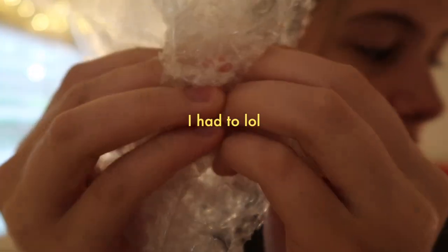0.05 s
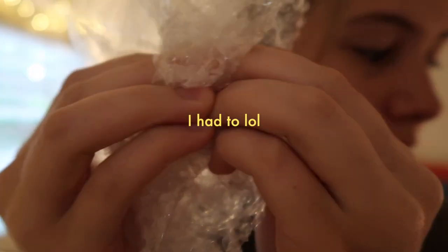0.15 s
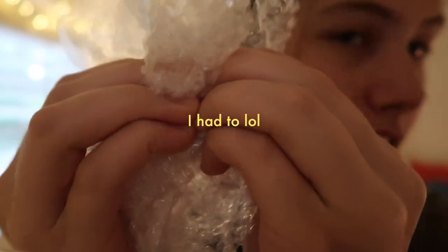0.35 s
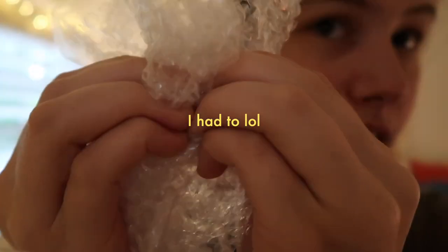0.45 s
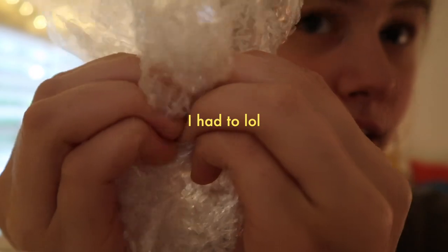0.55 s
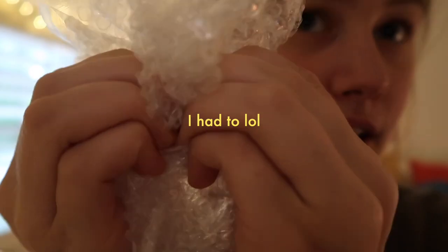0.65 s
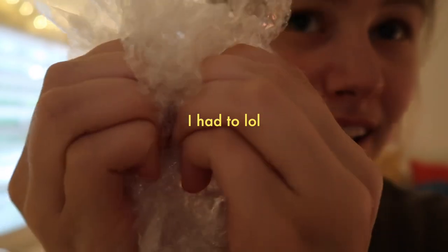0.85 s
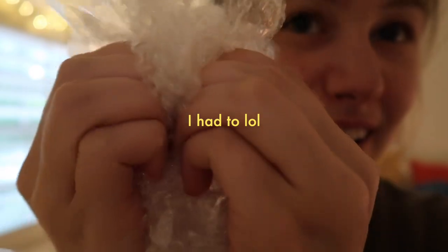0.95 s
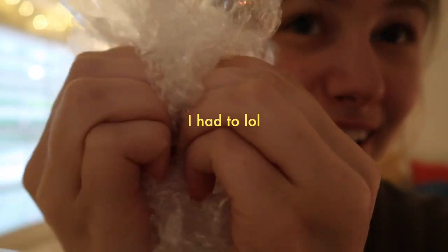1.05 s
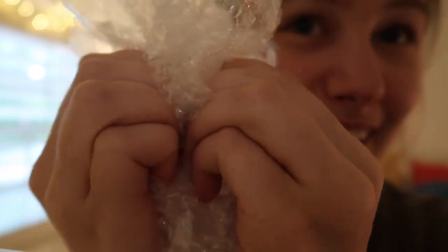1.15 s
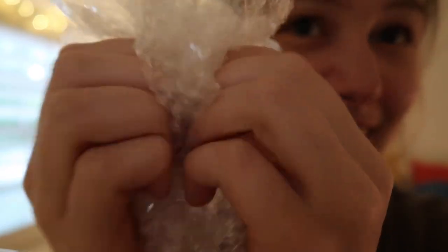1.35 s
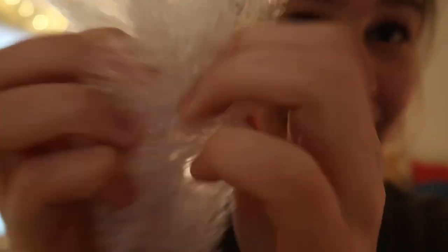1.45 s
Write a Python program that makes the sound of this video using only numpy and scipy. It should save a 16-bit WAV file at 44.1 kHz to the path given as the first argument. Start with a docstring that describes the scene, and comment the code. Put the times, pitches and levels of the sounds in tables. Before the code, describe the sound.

Bubble wrap pops in rapid, uneven clusters, some loud and some slight, as hands twist it right by the microphone. Faint plastic crinkling runs underneath and swells at the end with light snaps. The room is small and quiet.

```python
"""A wad of bubble wrap is wrung in two hands close to a stereo microphone in a small quiet room.
At first the film crinkles and fingers rub over faint air noise and hum. From 0.1 to 1.1 s bubbles burst
in clusters: each is a pressure swing of a few cycles, a crack of tearing film and a short ring of the
cupped wad, answered by the ceiling and then the room. The loudest pops saturate the microphone.
At the end the crinkling swells as the grip tightens, and three creases snap."""
import sys
import numpy as np
from scipy import signal
from scipy.fft import rfft, irfft, next_fast_len
from scipy.io import wavfile

SR = 44100
rng = np.random.default_rng(int(sys.argv[2]) if len(sys.argv) > 2 else 0)


def wrap_up_sound(samples):
    """Save the sound to the file named by the first command line argument, as 16-bit audio."""
    columns = np.atleast_2d(samples).T
    # keep every value between -1 and 1, then stretch to whole-number steps
    tamed = np.clip(columns, -1, 1)
    steps = np.round(tamed * 32767).astype(np.int16)
    wavfile.write(sys.argv[1], SR, steps)


N = 66150


def amp(db):
    """Decibels to amplitude ratio."""
    return 10 ** (np.asarray(db) / 20)


def unit_rms(x):
    """Normalisation to an rms of 1."""
    return x / np.sqrt(np.mean(x ** 2) + 1e-20)


def at_frequency(points, hz):
    """Interpolation of (frequency, value) points on a logarithmic frequency axis."""
    point_hz, values = np.transpose(points)
    return np.interp(np.log(hz + 1), np.log(point_hz + 1), values)


def envelope(points):
    """Amplitude envelope through (time, level) points, linear in decibels."""
    return amp(np.interp(np.arange(N) / SR, *np.transpose(points)))


def coloured(x, spectrum):
    """Minimum-phase filtering: folding the cepstrum makes the given gain curve causal."""
    n = x.shape[-1]
    size = 2 * next_fast_len(n // 2 + 2048)
    gain = amp(at_frequency(spectrum, np.fft.rfftfreq(size, 1 / SR)))
    cepstrum = irfft(np.log(gain), size)
    cepstrum[1:size // 2] *= 2
    cepstrum[size // 2 + 1:] = 0
    return irfft(rfft(x, size) * np.exp(rfft(cepstrum)), size)[..., :n]


def decay(t, t60):
    """Exponential damping by 60 dB in t60."""
    return np.exp(-np.log(1000) * t / t60)


def left_right(mid, side):
    """Sum-and-difference stereo."""
    return np.array([mid + side, mid - side])


def add(track, start_s, sound):
    """Superposition of a sound on the track."""
    part = track[..., round(start_s * SR):][..., :sound.shape[-1]]
    part += sound[..., :part.shape[-1]]


# Likeness of the room's sound at the two microphone ports: frequency_hz, correlation
PORT_COHERENCE = [(60, 0.99), (400, 0.75), (3100, 1), (7500, -0.82)]

def diffuse(pair):
    """Spatial coherence: two independent signals are mixed as the ports hear a diffuse field."""
    n = pair.shape[-1]
    correlation = at_frequency(PORT_COHERENCE, np.fft.rfftfreq(n, 1 / SR))
    angle = np.arccos(np.clip(correlation, -.99, .99)) / 2
    mid, side = irfft(rfft(pair) * [np.cos(angle), np.sin(angle)], n)
    return left_right(mid, side)


# Spectrum of the air noise: frequency_hz, gain_db
AIR_SPECTRUM = [(25, -11), (60, 0), (170, -3), (300, -12.5), (1500, -15.5), (5000, -24), (15000, -66)]
# Steady tones in the room: pitch_hz, level_db
HUM_TONES = [(120, -66), (560, -73.5)]

def room_tone(air_db=-57):
    """Ambient noise floor: diffuse broadband noise and a faint hum of pure tones."""
    air = unit_rms(diffuse(coloured(rng.standard_normal((2, N)), AIR_SPECTRUM)))
    hum = sum(amp(db) * unit_rms(np.sin(2 * np.pi * hz * np.arange(N) / SR)) for hz, db in HUM_TONES)
    return amp(air_db) * air + hum


# Fingers shifting on the wad: time_s, level_db
RUB_LEVELS = [(.1, -50.5), (.3, -55), (.72, -54), (.88, -61), (1.48, -55.5)]
# Spectrum of the rubbing: frequency_hz, gain_db
RUB_SPECTRUM = [(120, -15), (250, 3.5), (1000, -29.5)]

def finger_rub():
    """Sliding friction: skin on film makes a dull noise."""
    rub = unit_rms(diffuse(coloured(rng.standard_normal((2, N)), RUB_SPECTRUM)))
    return rub * envelope(RUB_LEVELS)


# Crinkling of the strained film: time_s, level_db
CRINKLE_LEVELS = [(0, -52.5), (.45, -54.5), (.6, -49), (.75, -50.5), (1.09, -51), (1.25, -67), (1.35, -56),
                  (1.44, -47), (1.49, -40.5)]
# Spectrum of the crinkling, also of a pop's scattered sound: frequency_hz, gain_db
CRINKLE_SPECTRUM = [(100, -41), (500, -2.5), (1000, -9), (1800, -2), (3100, -2.5), (5600, -14.5),
                    (8000, -16.5), (10500, -39.5), (14000, -31.5)]
# Port difference over port sum, for crinkles and cracks: frequency_hz, gain_db
SIDE_SPECTRUM = [(2200, -24), (5000, -2), (12000, 9.5)]
# Creases snapping: start_s, peak_db
CREASES = [(1.3427, -35), (1.4713, -24.5), (1.4889, -21.5)]

def crinkle(snaps_per_s=7000, spread_db=3, side_db=-12, crease_hz=2360, crease_decay_s=0.00016):
    """Shot noise: tiny random snaps of the strained film merge, while a few creases stand out."""
    snaps = (rng.random((2, N)) < snaps_per_s / SR) * rng.standard_normal((2, N))
    snaps *= amp(spread_db * np.clip(rng.standard_normal(N), -2, 2))
    mid, side = coloured(snaps, CRINKLE_SPECTRUM)
    side = amp(side_db) * coloured(side, SIDE_SPECTRUM)  # narrower than the cracks
    film = unit_rms(left_right(mid, side)) * envelope(CRINKLE_LEVELS)
    t = np.arange(SR // 100) / SR
    crease = t ** 2 * np.exp(-t / crease_decay_s) * np.sin(2 * np.pi * crease_hz * t)
    for start_s, peak_db in CREASES:
        add(film, start_s, amp(peak_db) * crease / np.abs(crease).max())
    return film


# Reverberation time of the room: frequency_hz, t60_s
REVERB_TIMES = [(200, 0.2), (1000, 0.37), (2500, 0.22)]

def room_response(onset_s=.007, rise_s=0.0008, first_echoes_per_s=800, quadruple_s=.016):
    """Reverberation: echo density grows quadratically with time; each frequency decays at its own rate."""
    age = np.maximum(np.arange(SR // 2) / SR - onset_s, 0)
    chance = np.clip(first_echoes_per_s / SR * (1 + age / quadruple_s) ** 2, 1e-3, 1)
    shape = (2, len(age))
    echoes = (rng.random(shape) < chance) * np.sign(rng.standard_normal(shape)) / np.sqrt(chance)
    echoes *= 1 - np.exp(-age / rise_s)
    hz, t, bands = signal.stft(echoes, SR, nperseg=256)
    bands *= decay(t, at_frequency(REVERB_TIMES, hz)[:, None])
    tail = diffuse(signal.istft(bands, SR, nperseg=256)[1])
    return tail / np.linalg.norm(tail[0])


# Modes of the air in the wad and the cupped hands: pitch_hz, level_db, t60_s
WAD_MODES = [(445, -29.5, 0.03), (875, -20.5, 0.017), (1194, -15, 0.0098), (1870, -16, 0.0042)]

def wad_ring(t, pitch_spread=.035, spread_db=1.5):
    """Cavity resonance: damped modes whose pitch and level vary a little from pop to pop."""
    ring = 0
    for hz, db, t60 in WAD_MODES:
        gain = amp(db + rng.normal(0, spread_db))
        pitch_hz = hz * (1 + rng.normal(0, pitch_spread))
        ring += gain * decay(t, t60) * np.sin(2 * np.pi * pitch_hz * t)
    return ring


# Spectrum of tearing film: frequency_hz, gain_db
TEAR_SPECTRUM = [(300, -22), (2000, 9.5), (4300, 4.5), (5800, -4.5), (7500, -6), (10000, -15), (16000, -27)]

def film_crack(t, attack, gain_db=-12.5, t60_s=0.014):
    """Fracture: the tearing film radiates a bright, quickly damped burst of noise."""
    noise = unit_rms(coloured(rng.standard_normal(t.shape), TEAR_SPECTRUM))
    mid, side = noise * decay(t, t60_s) * attack
    return amp(gain_db) * left_right(mid, coloured(side, SIDE_SPECTRUM))


# Colour of a pop at the microphone: frequency_hz, gain_db
POP_SPECTRUM = [(40, -15.5), (300, -0.5), (1230, 1), (1420, -5), (1620, 4.5), (3300, -0.5), (4800, -5),
                (5700, -16.5), (7300, -3), (10000, -18)]
MAX_PORT_LAG_S, FLAP_RISE_S = 1.6e-5, 0.00021
SCATTER_DB, SCATTER_T60_S = -16.5, 0.012  # off the hands and the microphone's housing

def pop(pitch_hz, rise_ms, ring_db, crack_db, film_hz):
    """Sudden pressure release: the freed air swings, the wad rings, the film cracks and flaps."""
    lag_s = np.clip(rng.standard_normal(), -1, 1) * MAX_PORT_LAG_S / 2
    t = np.maximum(np.arange(SR // 25) / SR + np.array([[lag_s], [-lag_s]]), 0)
    rises = t * 1000 / rise_ms  # time in units of the rise to the pulse's peak
    pulse = rises * np.exp(1 - rises)
    attack = 1 - np.exp(-rises)
    swing = pulse * np.cos(2 * np.pi * pitch_hz * t)
    swing -= pulse * swing.sum() / pulse.sum()  # zero mean pressure
    flap = t / FLAP_RISE_S * np.exp(1 - t / FLAP_RISE_S) * np.sin(2 * np.pi * film_hz * t)
    ring = wad_ring(t) * attack
    noise = unit_rms(coloured(rng.standard_normal(t.shape[1]), CRINKLE_SPECTRUM))
    scatter = noise * decay(t, SCATTER_T60_S) * (1 - np.exp(-rises / 2))
    body = swing + amp(crack_db) * flap + amp(ring_db) * (amp(SCATTER_DB) * scatter - ring)
    return coloured(body, POP_SPECTRUM) + amp(crack_db) * film_crack(t, attack)


# Colour of the ceiling reflection: frequency_hz, gain_db
CEILING_SPECTRUM = [(1200, -7), (2000, 8.5), (3200, -2.5), (6000, 10)]
# What the pops radiate into the room: frequency_hz, gain_db
ROOM_SPECTRUM = [(100, -14.5), (450, -7.5), (1100, -6.5), (2100, 4), (4500, -2), (7000, -6.5), (10000, -33)]
# Bursting bubbles, with ring, crack and room relative to their pop:
# start_s, level_db, pitch_hz, rise_ms, ring_db, crack_db, film_hz, room_db
BURSTS = [(0.1054, -23.5, 1300, 0.18, 4, -22, 3220, -10), (0.2143, 1.8, 2570, 0.14, -7.5, -7.5, 5820, -1),
          (0.2766, -9, 3450, 0.044, 6, -7, 2740, 3.5), (0.316, -7, 2170, 0.17, 2.7, -10.5, 2850, 0),
          (0.4841, -10.0, 3200, 0.17, 10, -16, 5360, 0), (0.4991, -13, 1590, 0.17, 7, -4.5, 4840, -1),
          (0.518, 0.5, 1940, 0.11, 0.6, -13, 5650, 1.5), (0.5584, -12.5, 1260, 0.13, -6, -5.5, 3770, -4),
          (0.5718, -22, 1300, 0.31, 9, -16, 3580, 5.5), (0.6069, -2, 2760, 0.15, -2, -5, 4830, 1.5),
          (0.6239, -5.5, 3140, 0.029, 3.5, -7.5, 4100, 4.5), (0.7094, -24, 1320, 0.17, 1.6, 1.5, 3260, 0),
          (0.7831, -19, 1293, 0.31, 11.5, 7.5, 3680, 4.5), (0.8005, 2.9, 2450, 0.25, -16, -20, 6600, -9),
          (0.825, -22, 2370, 0.17, 11.5, 8, 4370, 4.5), (0.8292, -15.5, 1710, 0.091, 3.5, -1, 3790, -3),
          (0.8715, -16, 2450, 0.2, 1, -14, 4870, -8), (0.934, -17, 3330, 0.145, -3.9, -15.5, 4870, -9),
          (0.9517, -11.5, 1350, 0.097, 1, -2.7, 4600, -0.5), (0.9718, -1.8, 2720, 0.12, -3.5, -8, 4570, -3),
          (1.0133, -11.5, 1430, 0.083, 6, 5, 3880, 4), (1.0395, -21, 3440, 0.05, 11, -4, 3010, -7.5),
          (1.064, -3, 1640, 0.081, -12.5, -8, 4500, 3.5), (1.084, -10, 1380, 0.098, -31, -4, 4020, 8),
          (1.0941, -1, 2210, 0.15, -12.5, -14.5, 3300, -12.5),
          (1.123, -14.5, 2210, 0.296, 3, -9, 3540, -5.5)]
REVERB_DB_PER_DB = 0.88  # below 1: the loudest pops face the microphone

def bubbles(ceiling_delay_s=.0071, ceiling_db=-21, reverb_db=-6):
    """Multipath propagation: each pop arrives directly, off the ceiling and as reverberation."""
    direct, outgoing, tails, ceiling_echo = np.zeros((4, 2, N))
    for start_s, level_db, pitch_hz, rise_ms, ring_db, crack_db, film_hz, room_db in BURSTS:
        burst = amp(level_db) * pop(pitch_hz, rise_ms, ring_db, crack_db, film_hz)
        add(direct, start_s, burst)
        add(outgoing, start_s, amp(room_db) * burst)
        excitation = amp(room_db) * np.linalg.norm(burst[0]) ** REVERB_DB_PER_DB
        add(tails, start_s, excitation * room_response())
    add(ceiling_echo, ceiling_delay_s, coloured(outgoing, CEILING_SPECTRUM))
    return direct + amp(ceiling_db) * ceiling_echo + amp(reverb_db) * coloured(tails, ROOM_SPECTRUM)


def scene():
    """Linear superposition: room tone, rubbing, crinkling and pops add as pressures."""
    return room_tone() + finger_rub() + crinkle() + bubbles()


def record(dry):
    """Saturation and band limiting: peaks are rounded off at full scale, then the top treble is cut."""
    cutoff_hz = 16400
    saturated = dry / (1 + np.abs(dry) ** 8) ** (1 / 8)
    size = next_fast_len(N + SR // 2)
    passband = np.fft.rfftfreq(size, 1 / SR) < cutoff_hz
    return irfft(rfft(saturated, size) * passband, size)[:, :N]


dry = scene()
out = record(dry)
wrap_up_sound(out)
```